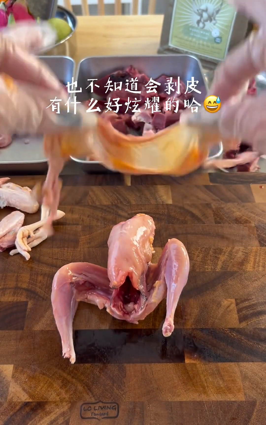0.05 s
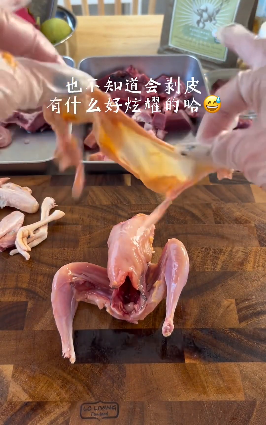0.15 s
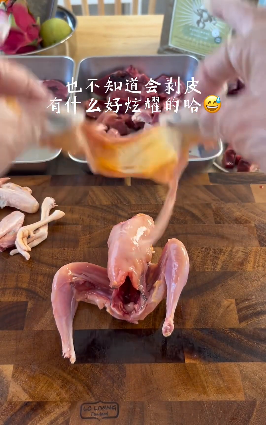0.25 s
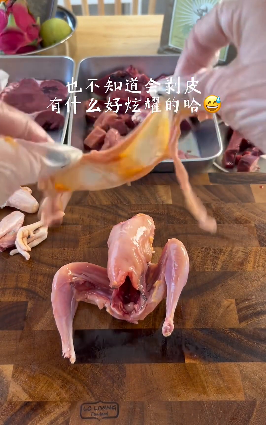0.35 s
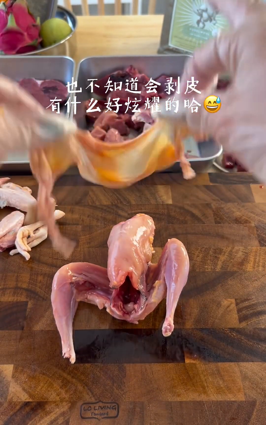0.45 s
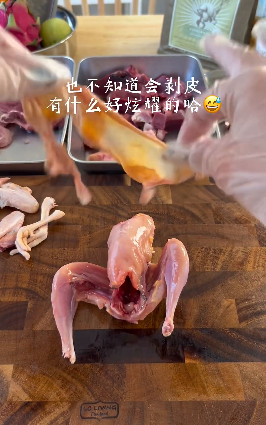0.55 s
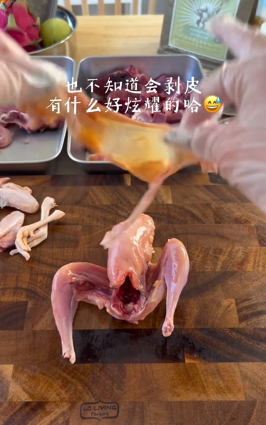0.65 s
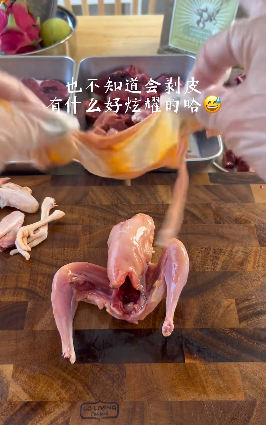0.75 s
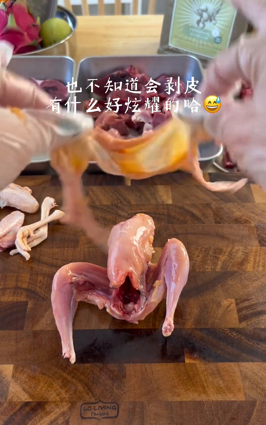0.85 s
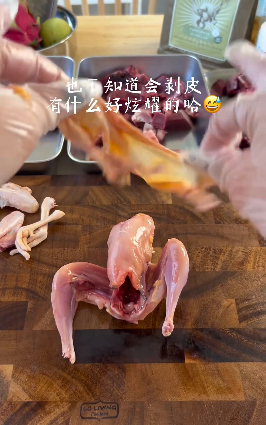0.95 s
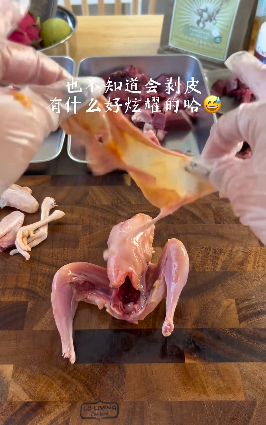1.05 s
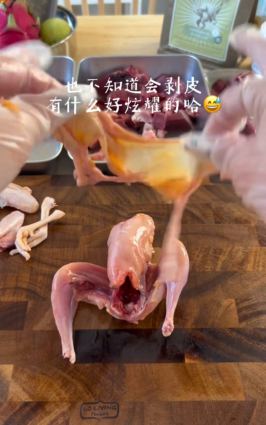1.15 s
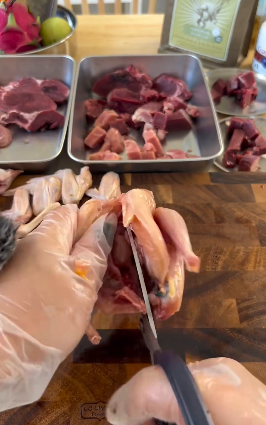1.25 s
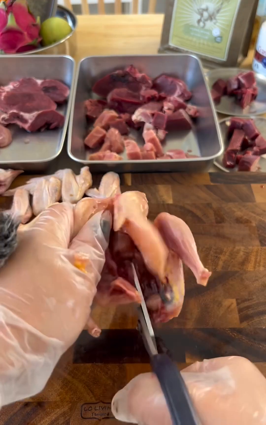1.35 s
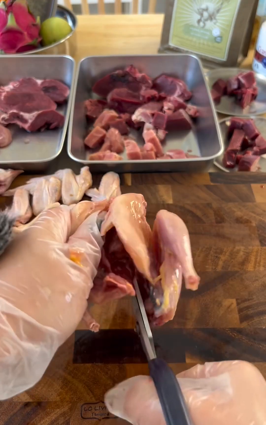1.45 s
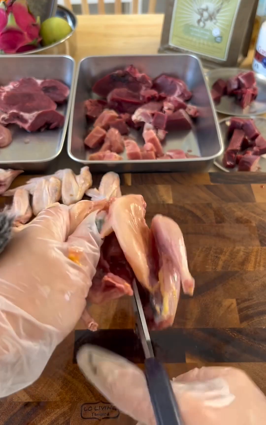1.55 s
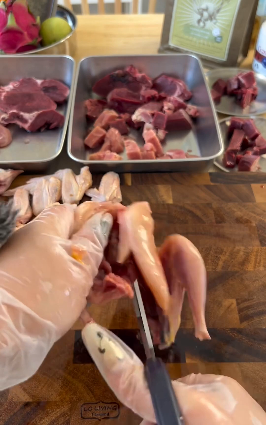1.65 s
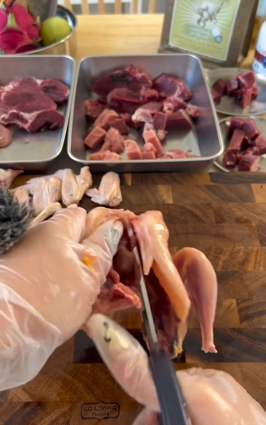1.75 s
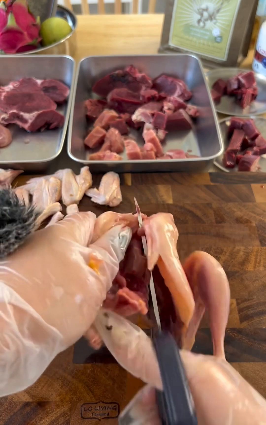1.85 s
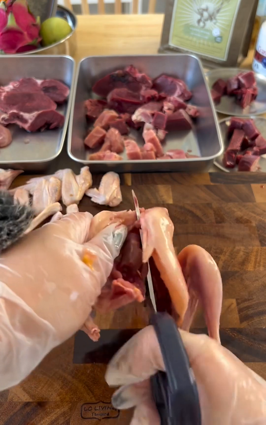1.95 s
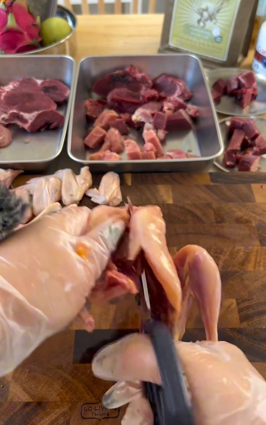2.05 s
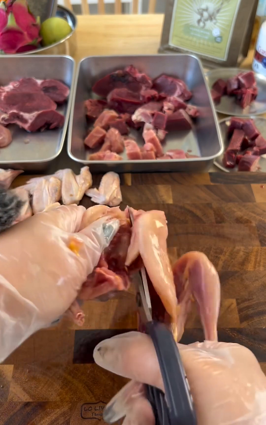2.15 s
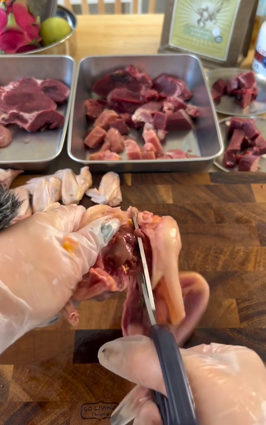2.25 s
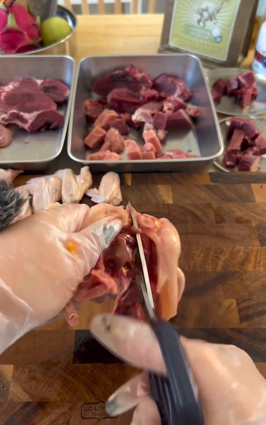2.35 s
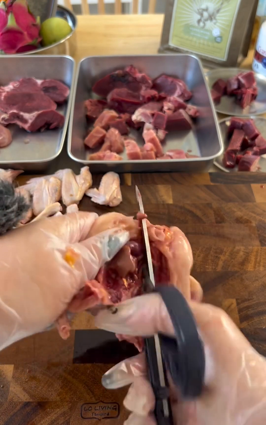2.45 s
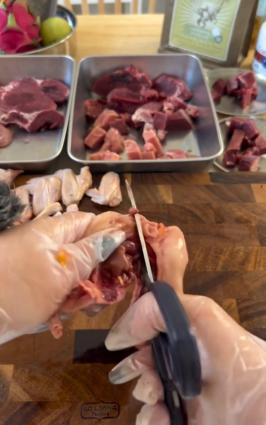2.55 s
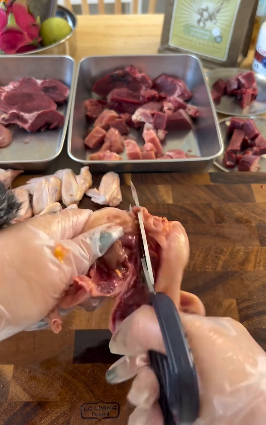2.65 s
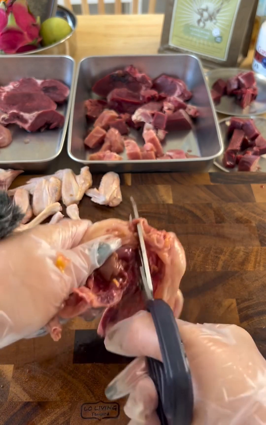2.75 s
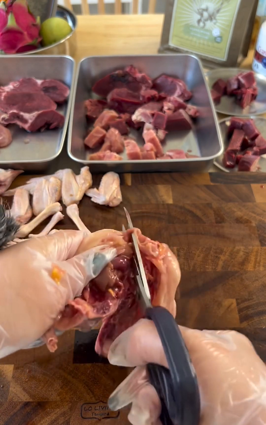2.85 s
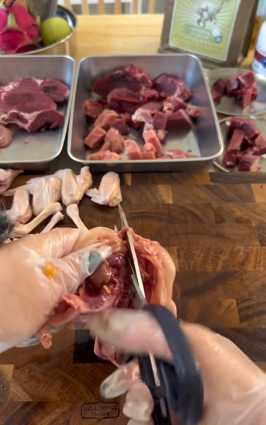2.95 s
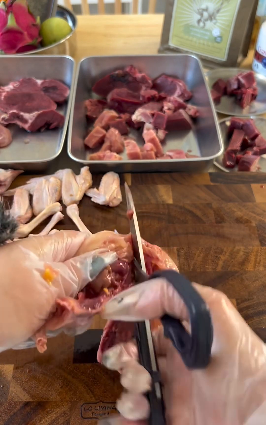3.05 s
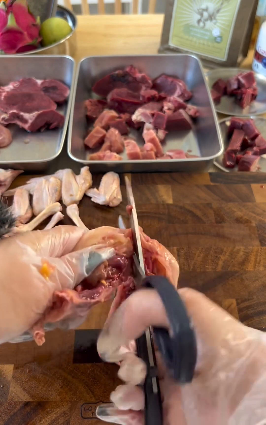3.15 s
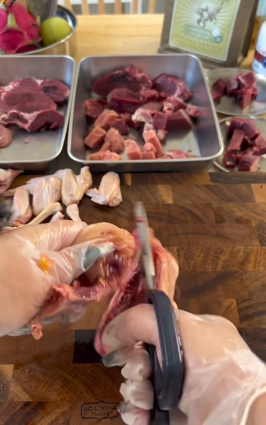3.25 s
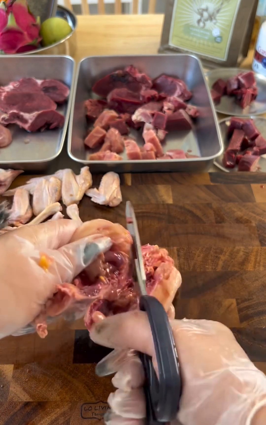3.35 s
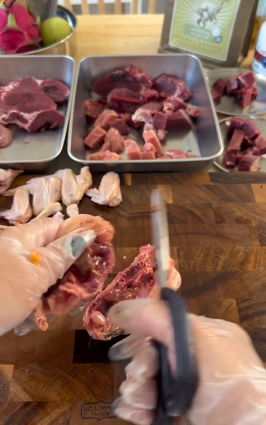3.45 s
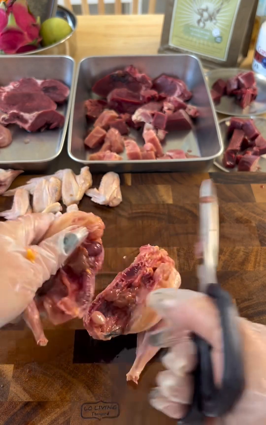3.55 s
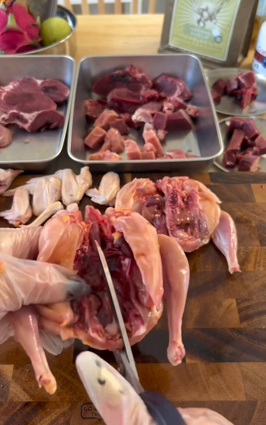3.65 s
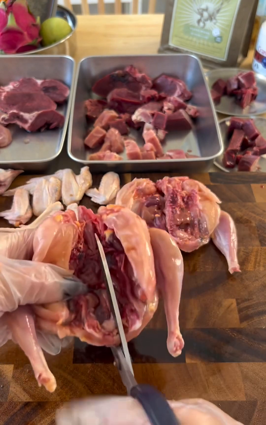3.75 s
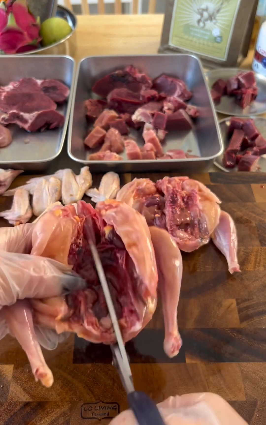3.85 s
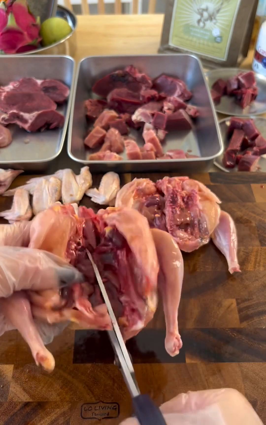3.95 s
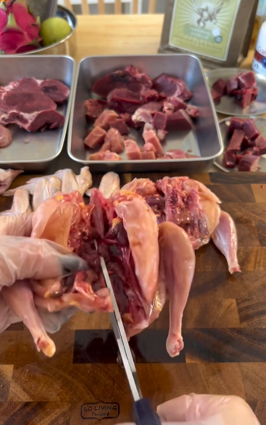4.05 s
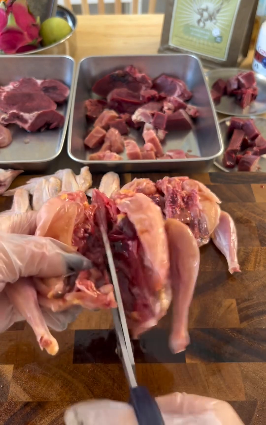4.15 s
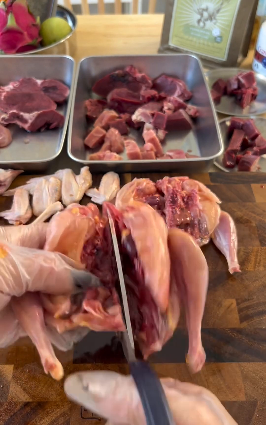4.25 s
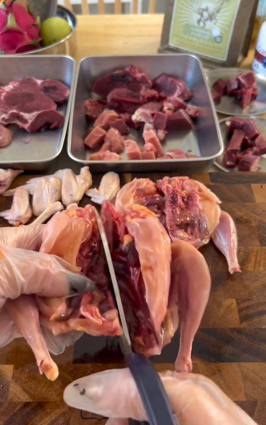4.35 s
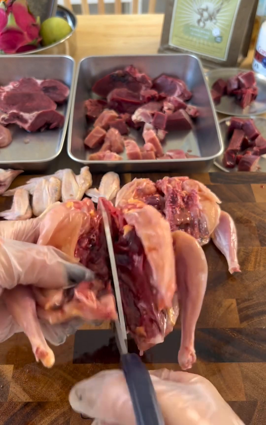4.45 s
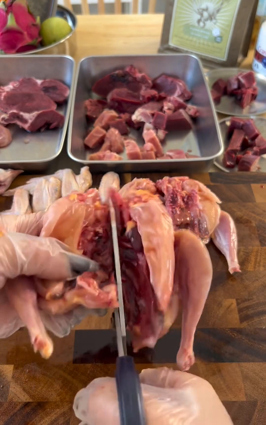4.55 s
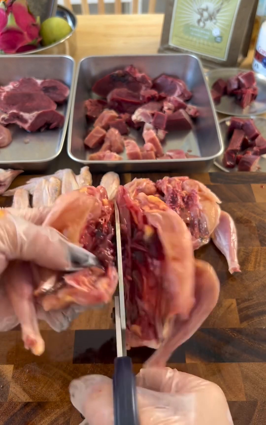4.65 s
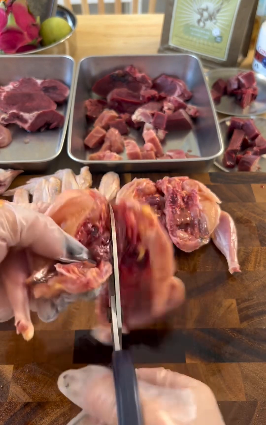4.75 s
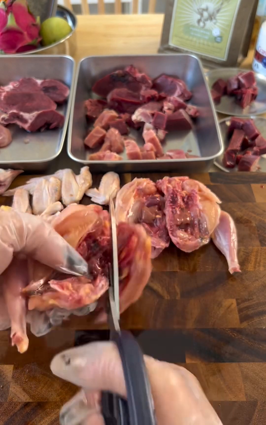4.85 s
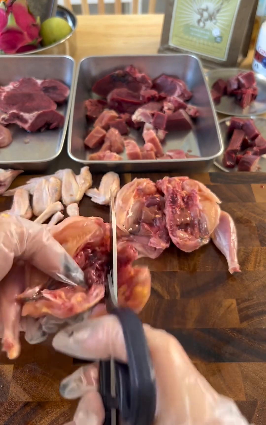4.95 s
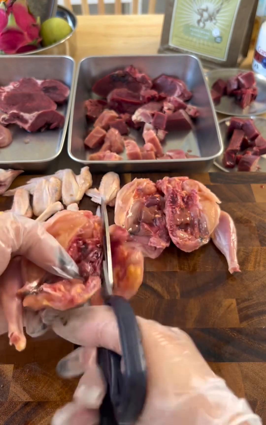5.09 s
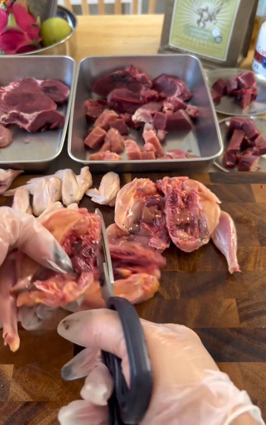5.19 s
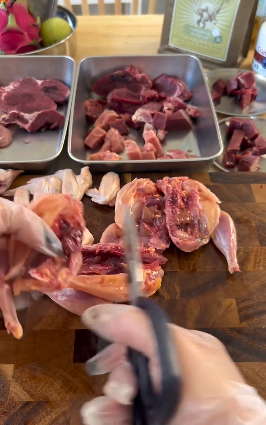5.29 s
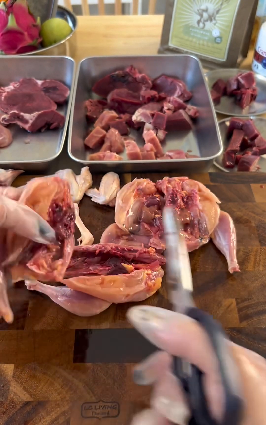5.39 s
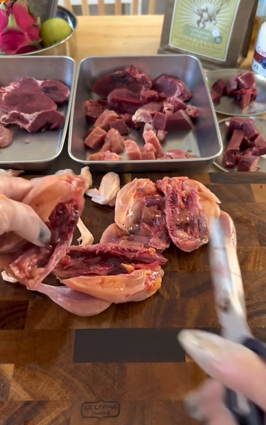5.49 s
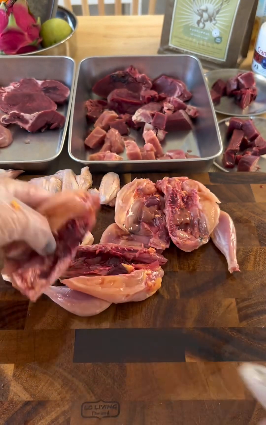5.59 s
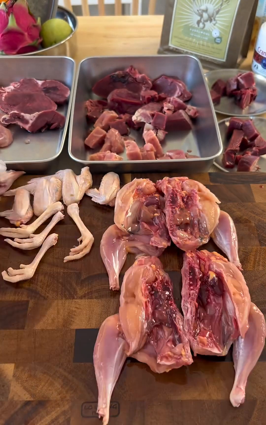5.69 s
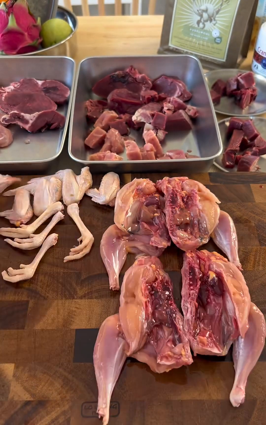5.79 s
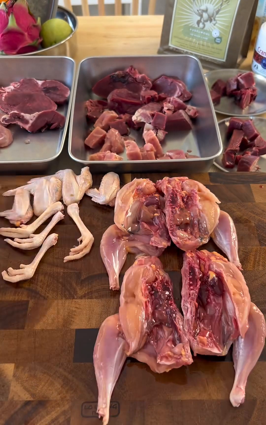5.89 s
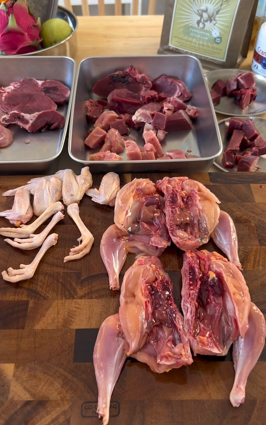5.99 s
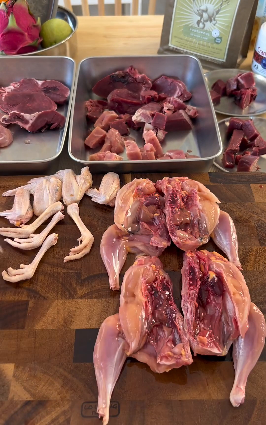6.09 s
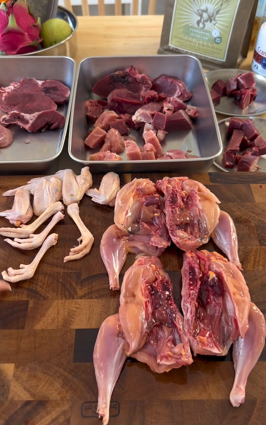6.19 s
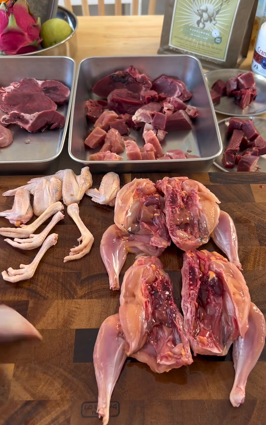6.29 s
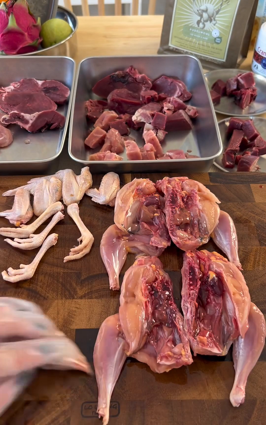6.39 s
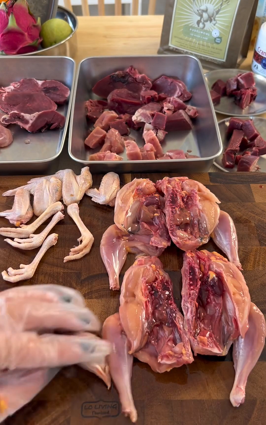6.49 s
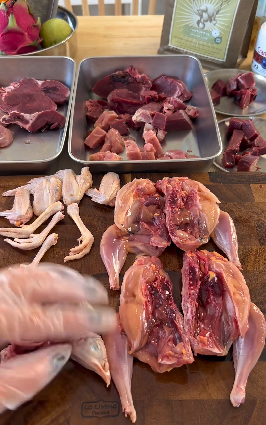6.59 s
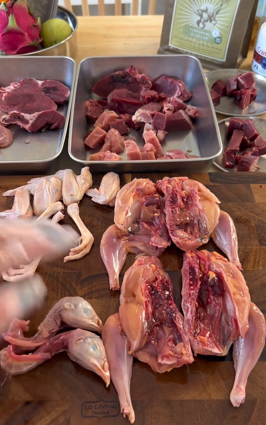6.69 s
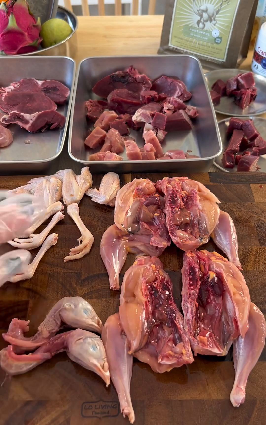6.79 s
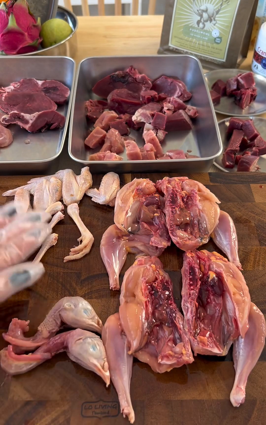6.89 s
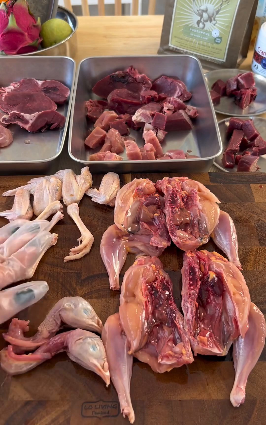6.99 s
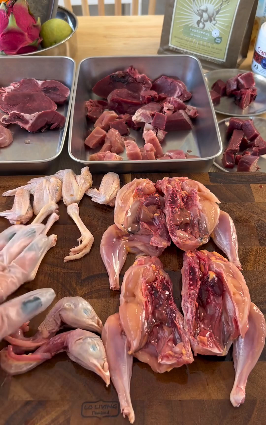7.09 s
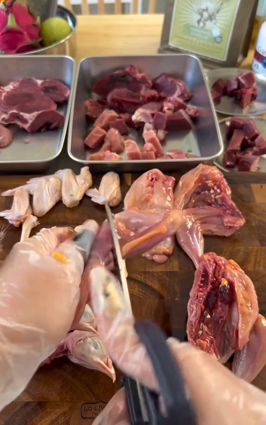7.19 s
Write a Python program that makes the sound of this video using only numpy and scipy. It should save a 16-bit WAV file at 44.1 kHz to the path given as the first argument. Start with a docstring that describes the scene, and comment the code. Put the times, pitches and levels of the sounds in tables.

```python
"""Cutting small birds with kitchen scissors

Kitchen scissors cut along the backbones of small raw birds held over a wooden board. Bones crack as
short bursts of shaped noise, gristle and wet meat rub as showers of grains, and the board and blades
ring as fading sine waves. A close microphone in a lively kitchen also hears echoes and a soft hush."""
import sys
import numpy as np
from scipy import signal
from scipy.fft import rfft, irfft, next_fast_len
from scipy.io import wavfile

SR = 44100
rng = np.random.default_rng(int(sys.argv[2]) if len(sys.argv) > 2 else 0)


def wav_out(sig):
    """Save sig, one row per channel (or a flat mono array), as 16-bit PCM at SR to the path in sys.argv[1]."""
    wavfile.write(sys.argv[1], SR, np.round(np.clip(np.atleast_2d(sig).T, -1, 1) * 32767).astype(np.int16))


N = 318843


def from_db(db):
    """Turn decibels into a gain."""
    return 10 ** (np.asarray(db) / 20)


def unit(x):
    """Scale a sound to an energy of one."""
    return x / np.sqrt(np.sum(x ** 2) + 1e-20)


def burst_gain(db):
    """Gain that gives a sound of energy one this level over 1 ms."""
    return from_db(db) * np.sqrt(SR / 1000)


def curve(rows):
    """Draw a smooth gain through rows of (t/s, level/dB)."""
    return from_db(np.interp(np.arange(N) / SR, *np.transpose(rows)))


def at_hz(points, hz, axis=1):
    """Read a table column between its frequencies, on a log scale."""
    points = np.array(points)
    return np.interp(np.log(np.maximum(hz, 1)), np.log(points[:, 0]), points[:, axis])


def bins(size):
    """List the frequencies in Hz of a real Fourier transform."""
    return np.arange(size // 2 + 1) * SR / size


def add(out, s, sound):
    """Mix a sound in, starting at s seconds."""
    at = max(round(s * SR), 0)
    out[at:at + len(sound)] += sound[:max(len(out) - at, 0)]


def butter(x, order, hz, kind="low"):
    """Keep only the lows, the highs or a band."""
    return signal.sosfilt(signal.butter(order, hz, kind, fs=SR, output="sos"), x)


def shaped(x, gain_db):
    """Colour a sound by a dB value per frequency, with no sound before its cause (minimum phase)."""
    cepstrum = irfft(np.log(from_db(gain_db)))
    fold = 1 + np.sign(len(x) / 2 - np.arange(len(x)))
    fold[0] = 1
    return irfft(rfft(x) * np.exp(rfft(cepstrum * fold)))


def noise(colour):
    """Make steady coloured noise with an rms of one."""
    size = next_fast_len(N, real=True)
    spectrum = rfft(rng.standard_normal(size)) * from_db(at_hz(colour, bins(size)))
    return unit(irfft(spectrum, size)[:N]) * np.sqrt(N)


def modes(table, size):
    """Ring like a struck object: fading sine waves, every other one upside down."""
    t = np.arange(size) / SR
    ring = np.zeros(size)
    for k, (hz, db, t60) in enumerate(table):
        ring += (-1) ** k * from_db(db - 60 * t / t60) * np.sin(2 * np.pi * hz * t)
    return ring


# tone colour shared by all cracks and rubs: (f/Hz, level/dB)
CRACK_COLOUR = [(40, -15.5), (150, -16), (350, -12), (600, -9), (950, -2.5), (1400, -1.5), (2200, 3),
                (3700, -1), (6000, -6.5), (8500, -7.5), (11000, -12.5), (14000, -20.5)]


def bone_db(hz, tilt):
    """Tip the shared colour about 4 kHz: a positive tilt in dB per octave is brighter."""
    return at_hz(CRACK_COLOUR, hz) + tilt * np.log2(np.clip(hz, 600, 14000) / 4000)


# cracks and small ticks of bone, wet skin or blades, and a few faint echoes:
# (t/s, level/dB over 1 ms, crumble time scale/ms, tilt/dB per octave, low end/dB,
# ring f/Hz, ring height/dB)
CRACKS = [(1.2761, -48, 0.18, -1, 2, 4660, 12), (1.3219, -44, 0.62, 4, 5, 9050, 8),
          (1.376, -21.5, 0.43, 0.5, 0, 8700, 4), (1.3786, -30, 1.64, 0.5, 13, 8280, 6),
          (1.388, -41, 1.2, -4, -5, 7330, 23), (1.399, -24.5, 0.57, -1, -2, 8900, 9.5),
          (1.4222, -24, 0.52, 1, 9.5, 3530, 11), (1.4244, -26, 0.33, -2, -12.5, 6230, 0.5),
          (1.438, -17, 0.32, -1, -4.5, 4400, 7), (1.464, -43, 1.3, 7, 13, 2400, 24),
          (1.47, -35, 0.86, 10, -2, 2100, 4), (1.4706, -24, 0.37, 0.5, 3.5, 2220, 9.5),
          (1.474, -28, 0.28, 3, -10, 3400, 6), (1.4821, -26, 0.99, 2.5, 5, 2010, 9),
          (1.4948, -39, 1, 12, -11, 9350, 7), (1.8652, -47, 0.51, 1.5, 0, 3530, 9),
          (2.004, -37.5, 0.6, -2, -7, 5630, 8), (2.106, -38.5, 0.38, -1.5, -3, 1830, 11),
          (2.1236, -43, 0.98, -3, -2, 8280, 19), (2.1281, -36.5, 1.5, -2, 8.5, 8700, 15),
          (2.1341, -29, 1.1, 5.5, 12, 1820, 6), (2.1425, -34.5, 0.3, 1, 3, 3250, 4),
          (2.1625, -32, 0.58, 8, 16, 2650, 7), (2.1684, -32.5, 0.81, 3, 17, 2440, 10),
          (2.192, -37, 0.92, 6, 5, 1230, 10), (2.2095, -36, 1.3, 2, 5, 9350, 15),
          (2.2148, -41, 0.29, 5, 3, 2250, 12.5), (2.2179, -38, 0.5, 4.5, 16, 1840, 8),
          (2.2234, -26.5, 0.75, 5.5, 3, 1860, 5.5), (2.2539, -34.5, 0.35, 2.5, -4, 4500, 2),
          (2.2574, -31.5, 0.95, 12, 15, 4690, 4), (2.262, -27.5, 1.07, 2.5, 6, 4840, 11),
          (2.4027, -39, 0.39, -4, -16, 8300, 13), (2.5194, -38.5, 1.7, 1.5, -20.5, 2230, 6.5),
          (2.5647, -42, 0.48, 1.5, 5, 6160, 10), (2.6855, -31.5, 0.33, 10, 12.5, 5290, 3),
          (2.6966, -21.5, 0.87, 6.5, -2, 3670, 4.5), (2.7001, -24.5, 0.41, 10, 8.5, 2160, 8),
          (2.702, -28.5, 0.76, 4, 17, 2170, 6.5), (2.7111, -29.5, 1.15, 4.5, 17, 3380, -1.5),
          (2.7402, -22.5, 0.57, 5, 11.5, 2170, 17.5), (2.7512, -41, 0.66, 0, 13.5, 2160, 7),
          (2.7656, -31, 0.84, 6.5, 16.5, 1550, 17.5), (2.802, -35.5, 1.1, 7, 16.5, 2340, 6),
          (2.8886, -37, 0.28, 7.0, 3, 3140, 6), (3.2744, -31, 1.13, 6, 18, 8400, 10),
          (3.2865, -24, 0.63, 4, 8.5, 1740, 12.5), (3.2895, -18, 0.8, 10.5, 12.5, 1000, 10),
          (3.2915, -24, 1.05, -1, 6, 8000, 23), (3.2976, -36, 1.3, 8.5, 16.5, 11000, 11),
          (3.3115, -15, 0.4, -0.5, -12, 2150, 12.5), (3.312, -20.5, 0.32, 2.5, -14.5, 6900, 15),
          (3.8009, -45.5, 0.66, -3.5, -16.5, 6230, 11.5), (3.9926, -28.5, 0.46, 4.5, 12, 7030, 8),
          (3.9959, -20, 0.55, 7.5, 4, 1280, 11.5), (3.9982, -21.5, 0.57, 5, 13, 7100, 13),
          (4.0005, -23.5, 0.68, 3.5, 13.5, 7400, 4.5), (3.99, -38, 0.76, 6, -3, 8000, 8),
          (4.0124, -28.5, 1.85, -2, 2, 11000, 13), (4.022, -33, 1.3, -0.5, 5, 1920, 10),
          (4.025, -36, 1.7, 4, 9, 3670, -9), (4.042, -38, 0.74, 8, 23, 4880, 1),
          (4.0494, -21, 0.17, 0, -18, 2800, 6.5), (4.0513, -19.5, 0.78, 7, 10, 11000, -2),
          (4.056, -29.5, 0.9, 0, 14, 2430, 11), (4.0994, -29, 0.74, 2.5, 11, 2900, 0),
          (4.65, -37.5, 0.99, 2.5, 8, 9740, 10), (4.6577, -35.5, 0.77, 2.5, 13, 10140, 9),
          (4.6618, -34.5, 0.45, -2.5, -10, 10140, 26), (4.679, -29, 0.21, -5, -26, 11000, 13),
          (4.6819, -27, 0.89, 3.5, -3, 2720, 12), (4.6965, -27, 0.55, -2, -1.5, 1800, 3),
          (4.6999, -25, 1.07, -2, 6, 5140, 19), (4.7045, -21, 0.7, 9.5, 0, 4800, 8),
          (4.718, -21.5, 0.47, 10, 17, 1780, 12), (4.7224, -26, 0.77, 4, -13, 6750, 8),
          (4.7544, -32, 0.69, 0.5, 3, 9740, 7), (4.7564, -31, 0.83, 5.5, 9, 1920, 6),
          (5.0908, -42, 0.97, 15.5, 20, 3360, 16), (5.1642, -42, 0.45, -2, -12, 5050, 7),
          (5.1881, -30, 0.68, 10.5, 36.5, 7260, 3), (5.2314, -33.5, 1.2, 0.5, -2, 5080, 2),
          (5.7475, -52.5, 1.2, -5, -2.5, 4500, 15.5), (5.7677, -47.5, 0.47, 4.5, 15, 4320, 19),
          (6.7209, -43, 0.25, 6, 24.5, 7060, 8), (6.769, -53.5, 0.69, 2.5, 7, 3430, 16),
          (7.0463, -45.5, 2.2, -0.5, 15, 5000, 18)]
PATCH_GAP = 4.066  # spacing of chance peaks and dips in a crack's colour, on a scale of square-root Hz


def cracks(snap=0.43, crumble_scale=3.7, rise=.45, swell=0.65, grain_db=1.0, ring_octaves=0.25,
           ring_spread=0.46, body_hz=1400, uneven_db=2.5, size=4096, count=192):
    """Tiny fractures swell to a break and die within milliseconds; gives near and room sound."""
    near, far = np.zeros(N), np.zeros(N)
    hz = np.maximum(bins(size), 1)
    ms = (np.arange(size) - count) / SR * 1000  # leave room before the break for the swell
    for s, db, crumble_ms, tilt, body_db, ring_hz, ring_db in CRACKS + splinters():
        chance, sizes, shape = rng.standard_normal((3, size))
        # slow breaks also build up slowly
        age = ms / max(crumble_ms, .1) - rise
        envelope = np.exp(-np.maximum(-age / swell, age / crumble_scale))
        crumbs = unit(chance * from_db(grain_db * sizes) * envelope)
        # brittle bone gives way at once
        fracture = 1.0 * (np.arange(size) == np.argmin(abs(age)))
        force = crumbs + fracture * snap / max(crumble_ms, .25)
        # each crack has its own pitch and a chance unevenness of colour
        ring = ring_db * np.exp(-.5 * (np.log2(hz / ring_hz) / ring_octaves) ** 2)
        patches = uneven_db * np.interp(np.sqrt(hz), np.arange(size) * PATCH_GAP, shape)
        # some breaks shake the whole carcass
        colour = bone_db(hz, tilt) + body_db / (1 + (hz / body_hz) ** 4)
        near_sound = unit(shaped(force, colour + ring + patches))
        # all directions together sound smoother
        far_sound = unit(shaped(fracture, colour + ring_spread * ring))
        add(near, s - count / SR, burst_gain(db) * near_sound)
        add(far, s - count / SR, burst_gain(db) * far_sound)
    return near, far


# squeezes of the scissors: (start t/s, length/s, shearing level/dB, shearing tilt/dB per octave,
# middle splinter level/dB over 1 ms before fading, board jolt/dB before its attack)
CUTS = [(1.366, 0.12, -71, 2, -41, -54.5), (2.124, 0.17, -58.5, 0.5, -43.5, -59.5),
        (2.695, 0.07, -52.5, 10, -59, -58), (3.286, 0.027, -48.5, 11, -30.5, -55),
        (3.994, 0.1, -43, 8.5, -41.5, -58), (4.693, 0.062, -51, 5, -40, -54),
        (5.151, 0.071, -59.5, 1, -51, -55.5)]
SPLINTER_MS, SPLINTER_BODY_DB = 0.44, 2.5  # crumble time scale and low end
SPLINTER_RING_HZ, SPLINTER_RING_DB = (1800, 9500), 1.5  # range of pitches and how far each stands out
SPLINTER_TILT_DB, SPLINTER_TILT_SPREAD_DB = 5.5, 5  # dB per octave, and spread either way
SPLINTER_SPREAD_DB, SPLINTER_FADE_DB = 5.5, 5  # spread either way, and fade as the blades close


def splinters(count=12):
    """Each squeeze sheds small cracks at chance moments, each with its own size, brightness and pitch."""
    rows = []
    low, high = SPLINTER_RING_HZ
    for start, length, _, _, db, _ in CUTS:
        for k, (when, strength, bright, pitch) in enumerate(rng.random((count, 4))):
            closed = (k + when) / count
            level = db + SPLINTER_SPREAD_DB * (2 * strength - 1) - SPLINTER_FADE_DB * closed
            tilt = SPLINTER_TILT_DB + SPLINTER_TILT_SPREAD_DB * (2 * bright - 1)
            ring_hz = low * (high / low) ** pitch
            rows.append((start + length * closed, level, SPLINTER_MS, tilt,
                         SPLINTER_BODY_DB, ring_hz, SPLINTER_RING_DB))
    return rows


def rub(strokes, grains_per_s, spread_db=4.0, slide=0.19, squareness=0.58, size=8192):
    """Fibres part one after another, as grains of uneven size over a smooth slide."""
    out, t = np.zeros(N), np.arange(size) / SR
    for s, length, db, tilt in strokes:
        happens = rng.random(size) < grains_per_s / SR
        grains = happens * from_db(spread_db * np.minimum(rng.exponential(1, size), 4))
        # pressure swells and lets go
        press = np.maximum(t * (length - t), 0) ** squareness
        force = press * (grains * rng.choice([-1, 1], size) + slide * rng.standard_normal(size))
        sound = unit(shaped(force, bone_db(bins(size), tilt)))
        add(out, s, from_db(db) * sound * np.sqrt(length * SR))
    return out


def shearing():
    """The blades shear gristle in a dense rush of grains during each squeeze."""
    return rub([cut[:4] for cut in CUTS], grains_per_s=4600)


# meat and gloves squelch as the bird is shifted and the blades reopen:
# (start t/s, length/s, level/dB, tilt/dB per octave)
SQUELCHES = [(0.342, .012, -70, 6), (0.389, .01, -67, 1), (0.839, 0.0058, -61, 0.5), (1.362, 0.011, -53, 4),
             (1.853, 0.094, -64.5, 3), (2.292, 0.061, -60, 6), (2.454, 0.069, -66.5, 4),
             (2.663, 0.0065, -49, 11), (3.037, 0.11, -60, 6.5), (3.226, 0.077, -67, 7),
             (3.778, 0.04, -54.5, 1), (3.901, 0.023, -56, 2.5), (3.956, 0.033, -57, 5.5),
             (3.992, 0.0036, -47, 5), (4.102, 0.041, -52.5, 6), (4.198, 0.087, -60, 3.5),
             (4.352, 0.044, -56, 6), (4.557, 0.029, -59, 2.5), (5.228, 0.058, -57.5, -1),
             (5.295, 0.043, -60, -1.5), (5.444, 0.048, -66, 2.5), (5.539, 0.034, -58.5, 4.5),
             (6.642, 0.064, -65.5, 3.5), (6.866, 0.072, -67.5, 4), (7.007, 0.018, -65, 0),
             (7.031, 0.024, -59.5, 2.5)]


def squelching():
    """Wet meat and gloves rub in sparser grains."""
    return rub(SQUELCHES, grains_per_s=2500)


# the scissors snap shut once the bone is through: (t/s, level/dB over 1 ms)
SNAPS = [(3.374, -16)]
# ringing tones of the closed scissors: (f/Hz, relative level/dB, time to fall 60 dB/s)
SCISSORS = [(2150, -31, 0.02), (3330, -17, 0.015), (4230, -39, 0.015), (5260, 6.5, 0.0054),
            (5500, 7.5, 0.0043), (6040, 2, 0.0058), (6650, -5, 0.0063), (7260, -11, 0.0062),
            (8300, -14.5, 0.0064), (10650, -24, 0.0034)]


def snaps(grind_s=0.0003, far_ring_s=0.00026, low_hz=2800, size=4096):
    """Steel grinds onto steel and the hand soon damps the ring; gives near and room sound."""
    near, far, t = np.zeros(N), np.zeros(N), np.arange(size) / SR
    ring = butter(modes(SCISSORS, size), 2, low_hz, "high")  # narrow blades give off few lows
    clash = ring * np.exp(-t / far_ring_s)  # only the first clash fills the room
    for s, db in SNAPS:
        force = rng.standard_normal(size) * t * np.exp(-t / grind_s)
        add(near, s, burst_gain(db) * unit(signal.fftconvolve(force, ring)))
        add(far, s, burst_gain(db) * unit(clash))
    return near, far


# bone or blade hits the board: (t/s, level/dB over 1 ms, contact brightness f/Hz,
# far level against near/dB before the room mix)
KNOCKS = [(2.3344, -33.5, 690, -9), (3.3767, -39, 550, -3.5), (4.8471, -19.5, 3140, -6),
          (4.862, -42, 2960, 1), (4.912, -36, 1910, -5), (5.196, -42.5, 1710, -2), (5.299, -45, 3470, -5),
          (5.31, -47, 3620, -10)]
# ringing tones of the board and what stands on it: (f/Hz, relative level/dB, time to fall 60 dB/s)
BOARD = [(340, -19, 0.009), (648, -4.5, 0.034), (746, 1, 0.014), (865, -3, 0.011), (1114, -14, 0.014),
         (1630, -7.5, 0.038), (1673, -8, 0.032), (1960, -13.5, 0.0092), (2330, -14, 0.015),
         (2655, -9, 0.022), (3040, -11.5, 0.022), (3520, -3.5, 0.017), (5090, 2.5, 0.004)]
# the board's many weak, crowded tones, heard as one woody burst: (f/Hz, level/dB)
WOOD_COLOUR = [(100, -36), (450, -11), (700, -4), (1100, -5), (1650, -1), (2700, -2), (3200, -20.5),
               (5000, -24), (14000, -45.5)]


def knocks(rattle=0.4, rattle_s=0.02, far_ring_s=0.0014, far_top_hz=2500, wood_db=-2.0,
           wood_s=0.017, order=6, size=4096):
    """Uneven blows ring the board, a fleshy contact only its lows; gives near and room sound."""
    near, far, t = np.zeros(N), np.zeros(N), np.arange(size) / SR
    ring = modes(BOARD, size)
    # the dull part of the first clack fills the room
    clack = unit(butter(ring * np.exp(-t / far_ring_s), order, far_top_hz))
    for s, db, contact_hz, far_db in KNOCKS:
        chance, crowd = rng.standard_normal((2, size))
        force = rattle * unit(chance * np.exp(-t / rattle_s))
        force[0] = 1  # the blow itself, before the rattle
        force = butter(force, 2, contact_hz)
        burst = shaped(crowd * np.exp(-t / wood_s), at_hz(WOOD_COLOUR, bins(size)))
        wood = from_db(wood_db) * unit(burst)
        far_sound = unit(signal.fftconvolve(force, clack + wood))
        add(near, s, burst_gain(db) * unit(signal.fftconvolve(force, ring)))
        add(far, s, burst_gain(db) * from_db(far_db) * far_sound)
    return near, far


# low colour of the jolted board: (f/Hz, level/dB)
THUD_COLOUR = [(20, -8), (45, 10.5), (90, 6), (170, 2), (280, 2), (500, -37), (1000, -73)]
LEAN_S = .025  # the hands lean on the board this long before the blades bite
KNOCK_JOLT_DB = -69  # jolt under a knock, before its attack


def thuds(decay_s=0.02, attack_s=0.00055, size=8192):
    """Listed cracks within a squeeze jolt the board as hard as the hands lean; so does each knock."""
    power, t = np.zeros(N), np.arange(size) / SR
    jolts = [(s, KNOCK_JOLT_DB) for s, *_ in KNOCKS]
    for start, length, *_, db in CUTS:
        jolts += [(s, db) for s, *_ in CRACKS if start - LEAN_S <= s <= start + length]
    envelope = np.exp(-t / decay_s) * (1 - np.exp(-t / attack_s))
    for s, db in jolts:
        add(power, s, (from_db(db) * envelope) ** 2)
    return np.sqrt(power) * noise(THUD_COLOUR)


# the bird is pressed onto the board or let go: (t/s, level before attack and decay/dB, pitch f/Hz)
THUMPS = [(1.423, -44, 230), (1.483, -45, 240), (2.337, -39, 190), (2.745, -44.5, 75), (3.911, -44.5, 85.5),
          (4.063, -55, 70), (4.0995, -37, 190), (4.701, -39, 150), (5.325, -54, 80)]
THUMP_CYCLES = 6.4  # meat damps a thump by 60 dB within this many cycles


def thumps(attack_s=.0008, size=8192):
    """The soft mass of the bird bounces on the board for a few low cycles."""
    out, t = np.zeros(N), np.arange(size) / SR
    for s, db, hz in THUMPS:
        bounce = modes([(hz, db, THUMP_CYCLES / hz)], size)
        add(out, s, bounce * (1 - np.exp(-t / attack_s)))
    return out


# faint crinkling of the gloves while the hands move: (t/s, level/dB)
CRINKLE = [(0, -84), (.45, -81), (1.2, -85), (1.8, -79), (3.7, -75), (4.5, -77), (5.45, -73), (5.65, -92),
           (6.6, -92), (6.68, -72), (7.1, -74), (7.2, -80)]
# colour of the crinkling: (f/Hz, level/dB)
CRINKLE_COLOUR = [(200, -16.5), (1200, -4.5), (3500, 4.5), (7000, -3), (14000, -16.5)]
CRINKLES_PER_S = 86


def crinkling(spread_db=6.5):
    """Thin glove film crinkles in sparse grains of uneven size."""
    size = next_fast_len(N, real=True)
    happens = rng.random(size) < CRINKLES_PER_S / SR
    sizes = from_db(spread_db * np.minimum(rng.exponential(1, size), 3))
    grains = happens * rng.standard_normal(size) * sizes
    crinkle = shaped(grains, at_hz(CRINKLE_COLOUR, bins(size)))[:N]
    return curve(CRINKLE) * unit(crinkle) * np.sqrt(N)


# a gloved hand brushes the board: (start t/s, length/s, peak level/dB)
BRUSHES = [(7.176, .04, -58.5)]
# woody colour of the brush: (f/Hz, level/dB)
BRUSH_COLOUR = [(100, -25), (450, -10), (680, -1), (1000, 4), (1400, -3), (1900, -5), (2600, -16),
                (5000, -25), (14000, -40)]


def brushing():
    """A glove sliding over wood makes noise that swells and fades."""
    press = np.zeros(N)
    for s, length, db in BRUSHES:
        add(press, s, from_db(db) * np.sin(np.linspace(0, np.pi, round(length * SR))))
    return press * noise(BRUSH_COLOUR)


# early echoes off counter, wall and ceiling: (delay t/s, level/dB)
ECHOES = [(.0023, -32), (.0062, -28.5), (0.012, -32.5)]


def echoes(x):
    """Hard surfaces close by each return one copy."""
    out = np.zeros(N)
    for delay, db in ECHOES:
        add(out, delay, from_db(db) * x)
    return out


# how the kitchen's echo tail dies: (f/Hz, time to fall 60 dB/s, relative level/dB)
KITCHEN = [(100, 0.513, -11.5), (407, 1, -4.5), (890, 1, -5.5), (2200, 0.63, 1.5), (2930, 1, -3.5),
           (5500, 0.91, -4), (8100, 0.67, 1), (12700, 0.17, 0.5)]
# steel trays and blades ring on faintly: (f/Hz, relative level/dB, time to fall 60 dB/s)
STEEL_RING = [(633, -8.5, 0.29), (975, -1, 1), (1600, -3.5, 0.34), (1884, -10.5, 0.29), (2050, -7, 0.51),
              (2385, -3, 0.32), (2453, -2.5, .6), (2480, -5, 0.43), (3429, 0.5, 0.82), (3710, -16.5, 0.87),
              (5341, -4, .45), (6799, -7, 0.4), (7752, 0.5, .45), (9860, 4, .4)]


def kitchen(x, tail_db=-15.0, early_db=-13.0, ring_db=-26, early_s=0.036, uneven_db=5,
            gap_s=0.00092, order=2):
    """Quick reflections from counter and trays, ringing steel, then a tail that dies band by band."""
    t = np.arange(SR) / SR
    tail = np.zeros(SR)
    edges = np.geomspace(60, 16000, 15)
    for low, high in zip(edges, edges[1:]):
        hz = np.sqrt(low * high)
        band = butter(rng.standard_normal(SR), order, [low, high], "band")
        tail += band * from_db(at_hz(KITCHEN, hz, axis=2) - 60 * t / at_hz(KITCHEN, hz))
    # a few early reflections stand out
    sizes = from_db(uneven_db * rng.standard_normal(SR))
    early = rng.standard_normal(SR) * sizes * np.exp(-t / early_s)
    arrived = t > gap_s
    answer = from_db(tail_db) * unit(tail * arrived)
    answer += from_db(early_db) * unit(early * arrived)
    answer += from_db(ring_db) * unit(modes(STEEL_RING, SR))
    return signal.fftconvolve(x, answer)


REPOSITION_S = .15  # the hands take up a new place this long before each squeeze after the first


def moving_kitchen(x):
    """The hands move between squeezes, so each one meets its own pattern of reflections."""
    out = np.zeros(N)
    edges = [0] + [round((start - REPOSITION_S) * SR) for start, *_ in CUTS[1:]] + [N]
    for first, last in zip(edges, edges[1:]):
        add(out, first / SR, kitchen(x[first:last]))
    return out


# low handling noise, with a swell as the second bird is pressed down: (t/s, level/dB)
RUMBLE = [(0, -79.5), (1.1, -77), (1.35, -68), (2.85, -61), (3.3, -65.5), (3.87, -65.5), (3.92, -61.5),
          (4.0, -64.5), (4.5, -69.5), (4.9, -66), (5.6, -73)]
# colour of the rumble: (f/Hz, level/dB)
RUMBLE_COLOUR = [(20, -21), (50, -9), (80, -14.5), (110, -5), (190, -10), (280, -18), (600, -29.5)]


def rumble():
    """Handling makes a low noise that rises and falls."""
    return curve(RUMBLE) * noise(RUMBLE_COLOUR)


# a dull rush, perhaps a fan, that dies away: (t/s, level/dB)
FAN = [(0, -69.5), (.6, -67.5), (1.15, -64.5), (1.3, -66.5), (1.7, -77), (3.5, -90)]
# colour of the rush: (f/Hz, level/dB)
FAN_COLOUR = [(60, -13.5), (150, 1.5), (400, -1.5), (1000, -3.5), (1650, -4.5), (2000, -5.5), (2400, -6),
              (2540, -0.5), (2700, -13.5), (4700, -14.5), (6000, -18.5), (14000, -24.5)]


def fan():
    """A dull rush, perhaps a fan: coloured noise that swells a little and then dies away."""
    return curve(FAN) * noise(FAN_COLOUR)


# colour of the kitchen's hush: (f/Hz, level/dB)
HUSH = [(20, -11), (75, -11), (115, -2), (195, 2.5), (275, -1), (298, 4.5), (335, -5), (680, -4), (860, -7),
        (1400, -3.5), (1900, -11), (3000, -16), (6000, -23), (14000, -29.5)]


def hush(level_db=-67.2):
    """The kitchen's background is soft, steady coloured noise."""
    return from_db(level_db) * noise(HUSH)


def scene(board_near_db=0.0, board_room_db=10.5, snap_room_db=-4.0, bone_room_db=-1.0):
    """Cut close to the microphone; the broad board sends more sound round the room."""
    bone, bone_far = cracks()
    steel, steel_far = snaps()
    board, board_far = knocks()
    meat = shearing() + squelching() + thuds() + thumps() + crinkling() + brushing()
    direct = bone + meat + steel + from_db(board_near_db) * board
    to_room = meat + from_db(bone_room_db) * bone_far
    to_room += from_db(snap_room_db) * steel_far + from_db(board_room_db) * board_far
    background = rumble() + fan() + hush()
    mix = direct + echoes(direct) + moving_kitchen(to_room) + background
    return np.tile(mix, (2, 1))  # the same sound on both sides


def record(dry, cutoff_hz=14250):
    """Cut the top of the sound steeply."""
    return signal.sosfilt(signal.ellip(10, .1, 80, cutoff_hz, fs=SR, output="sos"), dry)


dry = scene()
out = record(dry)
wav_out(out)
```